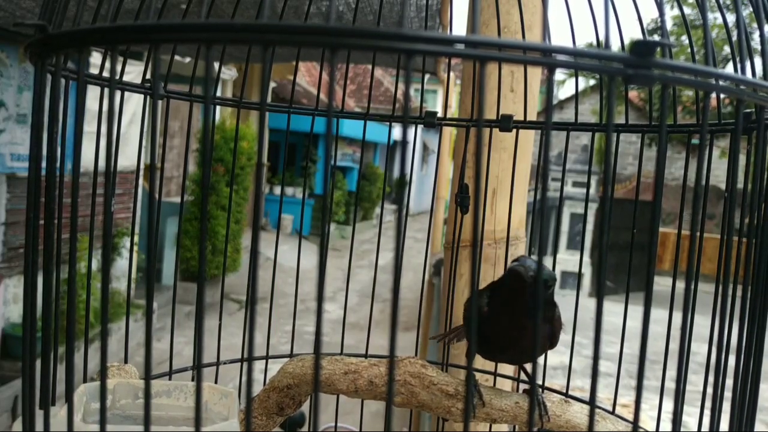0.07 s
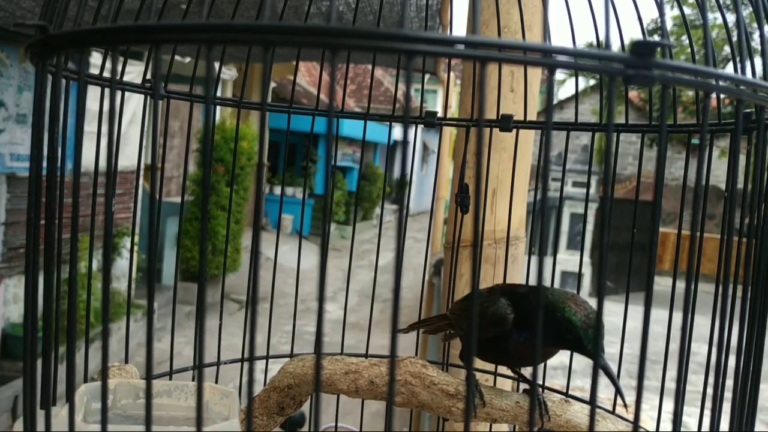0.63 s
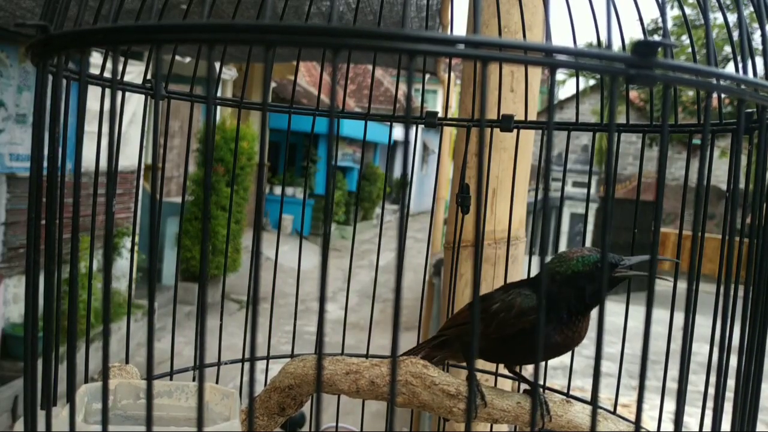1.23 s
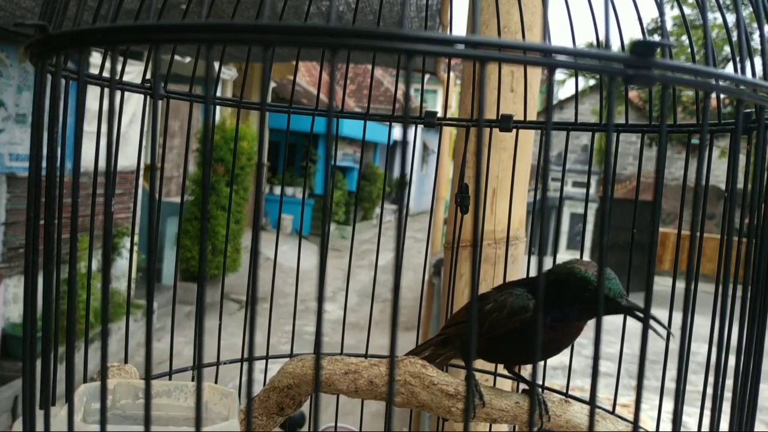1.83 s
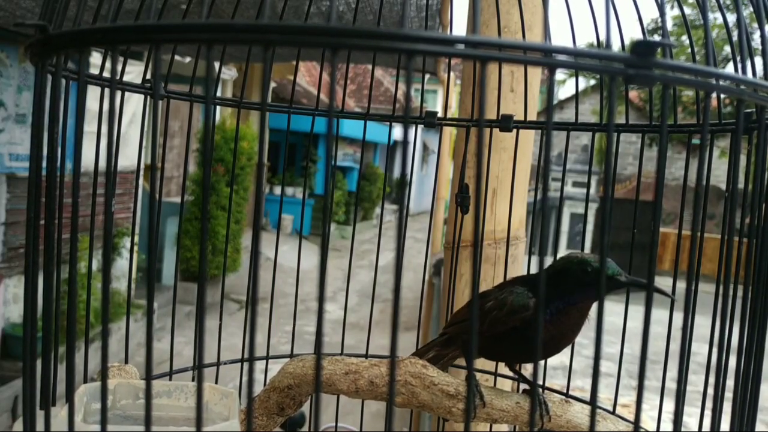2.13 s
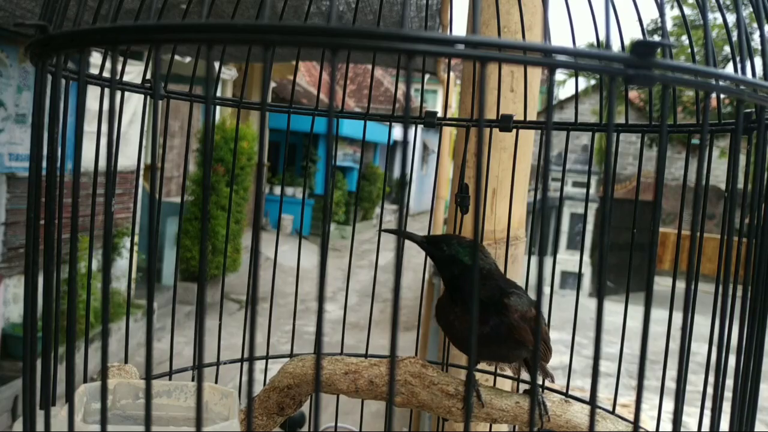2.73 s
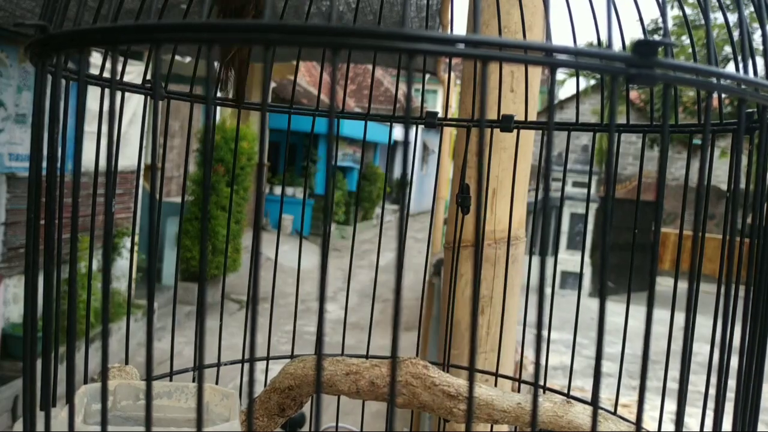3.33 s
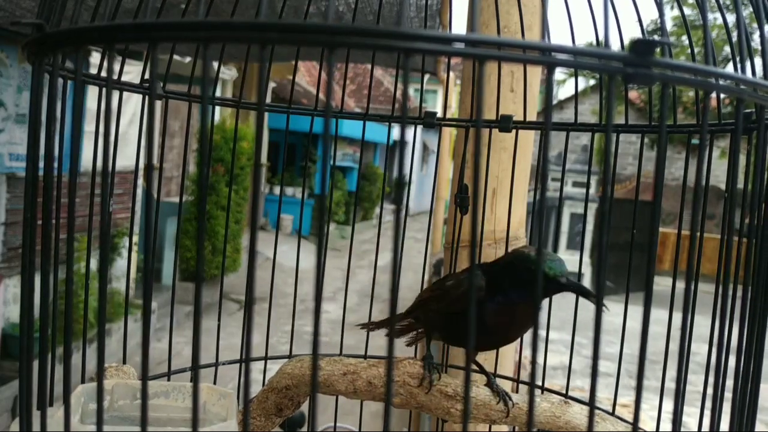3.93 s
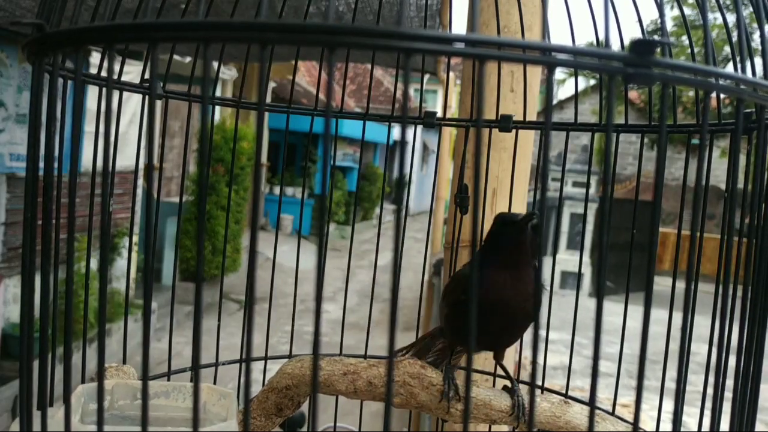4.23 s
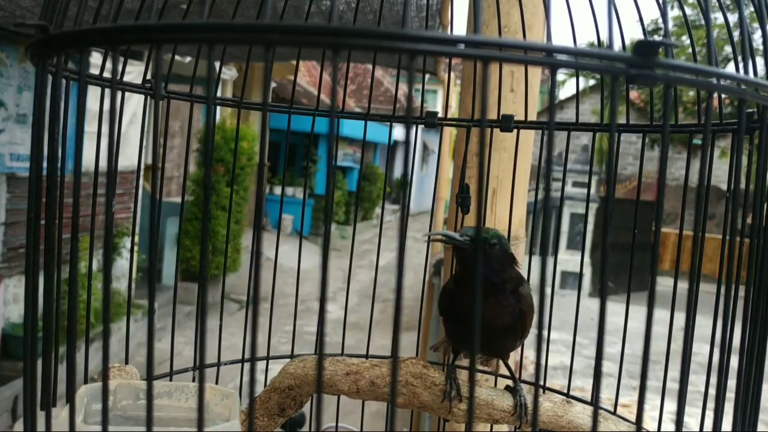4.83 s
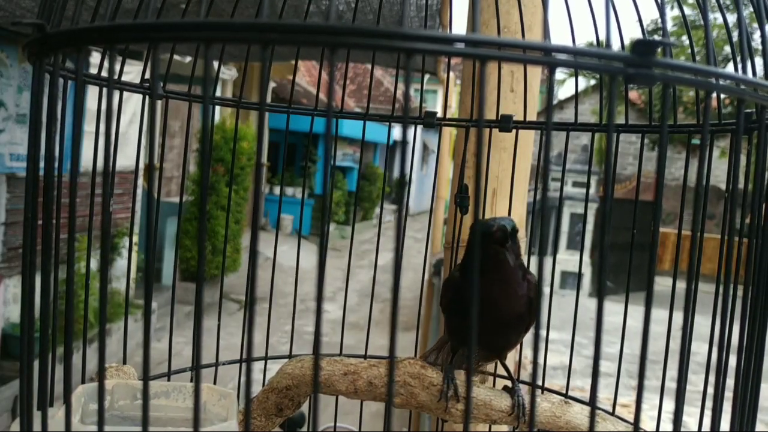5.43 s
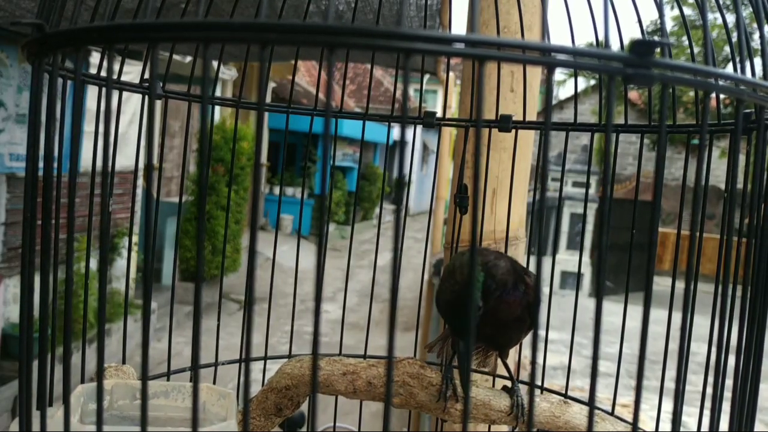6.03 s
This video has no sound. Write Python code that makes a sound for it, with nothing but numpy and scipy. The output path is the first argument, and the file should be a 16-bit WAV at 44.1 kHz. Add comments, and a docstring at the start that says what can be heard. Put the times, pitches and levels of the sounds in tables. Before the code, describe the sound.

A small caged bird gives sharp, high chirps close by and briefly flutters, over faint distant birds and a low town hum.

```python
"""A town hums and far birds twitter around a narrow lane. Close by, a caged sunbird wheezes on a slack
membrane, then chirps: fast arches of pitch, sung by both sides of its syrinx. A distant bird joins with
falling peeps. The sunbird wheezes again between chirps, pauses, and at three seconds flits up and back
to its perch before a quicker run of chirps. An automatic gain control ducks at every chirp and swells
back with the echo of the lane."""
import sys
import numpy as np
from scipy import signal
from scipy.fft import rfft, irfft
from scipy.io import wavfile
from scipy.ndimage import uniform_filter1d, minimum_filter1d

SR = 44100
rng = np.random.default_rng(int(sys.argv[2]) if len(sys.argv) > 2 else 0)


def wav_out(sig):
    """Save sig, one row per channel (or a flat mono array), as 16-bit PCM at SR to the path in sys.argv[1]."""
    wavfile.write(sys.argv[1], SR, np.round(np.clip(np.atleast_2d(sig).T, -1, 1) * 32767).astype(np.int16))


N = 272538
FREQS = np.maximum(np.arange(N // 2 + 1) * SR / N, 1)


def from_db(db):
    """Decibels to gain."""
    return 10 ** (np.asarray(db) / 20)


def rms_one(x):
    """Scale to unit rms."""
    return x / np.sqrt(np.mean(x ** 2) + 1e-20)


def at_hz(points, hz):
    """Read a curve on a log-frequency axis."""
    return np.interp(np.log(hz), *np.transpose([(np.log(f), v) for f, v in points]))


def add(out, start_s, sound):
    """Mix a sound in at a time."""
    start = max(round(start_s * SR), 0)
    out[..., start:start + sound.shape[-1]] += sound[..., :N - start]


def flutter(size, hz):
    """Random motion up to a given rate, at unit rms."""
    lowpass = signal.butter(2, hz, fs=SR, output="sos")
    return rms_one(signal.sosfilt(lowpass, rng.standard_normal(size)))


def ramp(x):
    """Smooth step from 0 to 1."""
    return np.sin(np.pi / 2 * np.clip(x, 0, 1)) ** 2


# Stereo image of the noise beds. Each row: frequency in Hz, correlation between the ears.
EAR_LIKENESS = [(60, 0.86), (170, 0.894), (350, 0.69), (700, 0.23), (1400, -0.63), (3000, 0.162),
                (12000, -0.044)]
def stereo_noise(spectrum):
    """Coloured noise at unit rms, centred in the bass and wide above it."""
    mid, side = rfft(rng.standard_normal((2, N))) * from_db(at_hz(spectrum, FREQS))
    alike = np.clip(at_hz(EAR_LIKENESS, FREQS), -1, 1)
    return rms_one(irfft(np.sqrt(1 + alike) * mid + np.sqrt(1 - alike) * np.array([side, -side]), N))


# Tone colour of the town's hum. Each row: frequency in Hz, relative level in dB.
TOWN_SPECTRUM = [(30, -43), (53, -36), (75, -18), (120, -14), (165, -2.5), (252, -0.5), (666, -9),
                 (1040, -12), (1760, -7), (2290, -9), (2750, -9), (6550, -17.5), (7670, -16.5),
                 (14400, -16.5), (16000, -39)]
def town_hum(db=-46, waver_db=.5):
    """A low bed of town noise whose level wavers slightly."""
    return from_db(db + waver_db * flutter(N, hz=9.7)) * stereo_noise(TOWN_SPECTRUM)


def far_twitters(per_s=12, length_s=.038, range_hz=(2890, 4700), faintest_db=-56.25, spread_db=7):
    """Small birds twitter at random, each short note sliding between two pitches."""
    out = np.zeros(N)
    progress = np.linspace(0, 1, int(length_s * SR))
    for when, first, last, loud in rng.random((int(per_s * N / SR), 4)):
        pitch = np.interp(first + (last - first) * progress, (0, 1), range_hz)
        level = from_db(faintest_db + spread_db * loud) * np.sin(np.pi * progress)
        add(out, when * (N - 1) / SR, level * np.sin(2 * np.pi * np.cumsum(pitch) / SR))
    return out


# A slack membrane slaps shut, a taut one swings smoothly.
# Each row: pitch in Hz, step from one harmonic to the next in dB.
HARMONIC_STEPS = [(2000, 4.5), (3500, -4.5), (5000, -4), (7000, -8.5)]
# Resonance of the throat and open beak. Each row: frequency in Hz, gain in dB.
THROAT_EQ = [(700, -36.5), (1500, -29), (3000, -24), (4000, -15.5), (5500, -6), (6500, -0.5), (7300, -11),
             (8200, -14), (10000, -16), (12500, -18), (13800, -8), (15500, -30.5)]
def syrinx(hz, rasp, waver, jitter, hiss, gape_db, lead_s=0, damping_db=0):
    """One membrane heard through the throat, roughened by uneven cycles and air torn at each opening."""
    size = len(hz)
    hz = hz * (1 + waver * flutter(size, hz=500))
    phase = 2 * np.pi * np.cumsum(hz) / SR + jitter * rasp * flutter(size, hz=1200)
    step_db = at_hz(HARMONIC_STEPS, hz)
    tone = sum(from_db(step_db * (k - 1)) * ramp((SR / 2 - k * hz) / 3000) * np.sin(k * phase)
               for k in range(1, 5))
    opening = (1 + np.sin(phase)) / 2
    breath = hiss * np.minimum(rasp, 1) * rng.standard_normal(size) * opening
    f = np.maximum(np.arange(size + 1) * SR / (2 * size), 1)
    beak_db = gape_db * ramp((f - 7500) / 4000)   # a wider beak lets out more of the top octave
    slack_db = damping_db * np.exp(-((f - 6500) / 2000) ** 2)   # a slack throat rings less
    colour = from_db(at_hz(THROAT_EQ, f) + beak_db - slack_db)
    ear_delay = np.exp(1j * np.pi * f * lead_s * np.array([[1], [-1]]))
    return irfft(rfft(tone + breath, 2 * size) * colour * ear_delay)[:, :size]


# The sunbird's two wheezy calls, the first broken into two notes. Each row: start in seconds,
# length in seconds, starting pitch in Hz, final pitch in Hz, level in dB, rasp in dB.
WHEEZE_NOTES = [(0, 0.0375, 4215, 3810, -3, -22), (0.039, 0.0225, 4085, 4250, -5.5, -4.5),
                (1.117, .145, 4196, 4775, -14.5, -10.5)]
def wheezes(attack_share=.13, release_s=.005, fade_db=-12.5, rasp_fade_db=-6.5):
    """A slack membrane gives a hoarse, wavering note that swells, then fades as its pitch settles."""
    out = np.zeros((2, N))
    for start_s, length_s, start_hz, end_hz, db, rasp_db in WHEEZE_NOTES:
        progress = np.linspace(0, 1, int(length_s * SR))
        pitch = start_hz + (end_hz - start_hz) * np.sin(np.pi / 2 * progress)
        gate = ramp(progress / attack_share) * ramp((1 - progress) * length_s / release_s)
        pressure = gate * from_db(db + fade_db * progress)
        rasp = from_db(rasp_db + rasp_fade_db * progress)
        note = syrinx(pitch, rasp, waver=.032, jitter=2.1, hiss=.6, gape_db=-2.5, damping_db=11)
        add(out, start_s, pressure * note)
    return out


def pitch_arch(ms, crest_ms, crest_hz, droop_hz, knee_hz=4000, climb_hz_per_ms=270):
    """Membrane tension shoots up through a knee at 0 ms, rounds off at the crest and relaxes."""
    lead_in = climb_hz_per_ms * np.minimum(ms, 0)
    below_crest = (crest_hz - knee_hz) * np.clip(1 - ms / crest_ms, 0, 1) ** 2.1
    droop = droop_hz * (np.maximum(ms - crest_ms, 0) / 10) ** 1.3
    return np.maximum(crest_hz + lead_in - below_crest - droop, knee_hz / 3)


# The sunbird's chirps. Each row: time of the knee in seconds, level in dB, body length in ms, crest
# pitch in Hz, droop 10 ms past the crest in Hz, harshness from 0 to 1, left ear's lead in microseconds.
CHIRP_NOTES = [ (.1624, 1, 25, 7220, 201, 0, -12), (0.4751, 1.5, 24, 7250, 300, 0.02, -13),
               (0.5801, -1, 23.9, 7130, 200, 0, 28.5), (.8624, 1.5, 26.6, 7390, 200, 0, 56),
               (1.265, 0.5, 32, 6450, 500, 0.74, 65.5), (1.8606, 1.5, 25, 7160, 790, 0.08, 54),
               (3.9226, 2.5, 32.5, 6730, 465, 0.78, -12), (4.0547, 3, 31.8, 6540, 450, 0.77, -12),
               (4.2019, -0.5, 38.6, 6955, 615, 0.37, -11), (4.4355, 3, 29.9, 7060, 680, 0.57, 11),
               (4.8434, 2.5, 27.3, 7240, 250, 0, -47), (5.0919, 2, 29.7, 6780, 606, 0.66, 32),
               (5.3669, 2, 32.6, 6660, 438, 0.68, -22.5), (5.478, 2.5, 34.5, 6740, 620, .95, 28),
               (5.6028, 2, 30, 6670, 795, 0.82, -26)]
def chirps(release_ms=10.6, onset_rasp_db=6, low_joins_ms=5, low_swells_ms=11):
    """The high voice leads, rough until it settles; the low one joins near the crest and beats with it."""
    out = np.zeros((2, N))
    for knee_s, db, length_ms, crest_hz, droop_hz, harshness, ear_us in CHIRP_NOTES:
        def clear_to_harsh(clear, harsh):
            return clear + (harsh - clear) * harshness

        lead_in_ms = clear_to_harsh(1.493, 10)
        ms = np.arange(-lead_in_ms - 1.5, length_ms + 2, 1000 / SR)
        crest_ms = (crest_hz - 5050) / 139   # a higher crest takes longer to reach
        high_hz = pitch_arch(ms, crest_ms, crest_hz, droop_hz)
        low_hz = pitch_arch(ms, 1.2 * crest_ms, crest_hz - clear_to_harsh(900, 1350), .4 * droop_hz)
        rasp = from_db(clear_to_harsh(-18.5, -7.5) + onset_rasp_db * (1 - ramp(ms / 4)))
        high, low = [syrinx(hz, rasp, waver=.004, jitter=1.1, hiss=1.9, gape_db=1.5, lead_s=ear_us / 1e6)
                     for hz in (high_hz, low_hz)]
        attack_ms = 1.86 * (lead_in_ms + 1)
        gate = ramp((ms - ms[0]) / attack_ms) * ramp((ms[-1] - ms) / release_ms)
        climb_db = clear_to_harsh(-6.5, 3.5)   # pressure on the climb, against that at the crest
        pressure = gate * from_db(db + climb_db * (.5 - ramp(ms / crest_ms)))
        high_gain = from_db(clear_to_harsh(3, -.5) * (np.maximum(ms, 0) / length_ms) ** 2)
        low_gain = from_db(clear_to_harsh(-12, -6.5)) * ramp((ms - low_joins_ms) / low_swells_ms)
        add(out, knee_s + ms[0] / 1000, pressure * (high_gain * high + low_gain * low))
    return out


# The distant bird's peeps. Each row: start in seconds, level sent to the echo in dB.
PEEP_NOTES = [(.33, -42), (.575, -47), (0.968, -42.5), (1.375, -46), (1.669, -43.5), (2.29, -45.5),
              (2.519, -46.5), (2.8, -44.5), (3.335, -46.5), (3.691, -42), (4.235, -45.5), (4.51, -41),
              (5.106, -41), (5.61, -42.5), (5.874, -41)]
def far_peeps(start_hz=3950, end_hz=2620, length_s=.105, pitch_spread=.0253, length_spread=.1425):
    """Thin falling whistles, no two quite alike, made unsteady by the long way they travel."""
    out = np.zeros(N)
    for (start_s, db), (higher, longer) in zip(PEEP_NOTES, rng.uniform(-1, 1, (len(PEEP_NOTES), 2))):
        size = int(length_s * (1 + length_spread * longer) * SR)
        progress = np.linspace(0, 1, size)
        glide = end_hz + (start_hz - end_hz) * (1 - progress) ** 1.7
        pitch = glide * (1 + pitch_spread * higher) * (1 + .035 * flutter(size, hz=200))
        gate = ramp(progress / .1) * ramp((1 - progress) / .21)
        level = gate * from_db(db + 3.5 * flutter(size, hz=60))
        add(out, start_s, level * np.sin(2 * np.pi * np.cumsum(pitch) / SR))
    return out


# Tone colour of brushing feathers. Each row: frequency in Hz, relative level in dB.
FEATHER_SPECTRUM = [(590, -35.5), (1000, -4.5), (2710, -1), (3300, -29), (3710, -3.5), (11600, -12),
                    (16000, -9)]
# The flit up and the flit back. Each row: start in seconds, length in seconds, air puff level in dB,
# its change over the flight in dB, feather rustle level in dB, its change in dB.
FLITS = [(3.082, 0.194, -38, -15.5, -70, 3), (3.63, 0.193, -53, 5, -51, 10.5)]
def wings(wingbeat_s=.033, puff_s=.017, rustle_rise_s=.018, rustle_fall_s=.038, uneven_db=2.5):
    """Each steady wingbeat pushes a soft puff of air and brushes the feathers together."""
    t = np.arange(N) / SR
    puff, rustle = np.zeros((2, N))
    for start_s, length_s, puff_db, puff_change_db, rustle_db, rustle_change_db in FLITS:
        for beat_s in np.arange(0, length_s, wingbeat_s):
            age = t - start_s - beat_s
            puff += from_db(puff_db + puff_change_db * beat_s / length_s) * np.exp(-(age / puff_s) ** 2)
            brush = ramp(1 + age / rustle_rise_s) * np.exp(-np.maximum(age, 0) / rustle_fall_s)
            rustle += from_db(rustle_db + rustle_change_db * beat_s / length_s) * brush
    air = stereo_noise([(60, -54), (140, -8.5), (190, 4), (270, -9), (600, -13.5),
                        (1500, -23), (6000, -64)])
    feathers = from_db(uneven_db * flutter(N, hz=80)) * stereo_noise(FEATHER_SPECTRUM)
    return puff * air + rustle * feathers


def lane_echo(x, early_db, late_db, early_t60, late_t60, build_s=.0045):
    """Dense reflections off the near walls, then a longer echo down the lane; different in each ear."""
    t = np.arange(SR) / SR
    response = 0
    for db, t60 in ((early_db, early_t60), (late_db, late_t60)):
        echoes = rng.standard_normal((2, SR)) * ramp(t / build_s) * from_db(-60 * t / t60)
        response = response + from_db(db) * rms_one(echoes) / np.sqrt(SR)
    return signal.fftconvolve(np.broadcast_to(x, (2, N)), response, axes=1)[:, :N]


# Stereo tilt on the sunbird's voice. Each row: frequency in Hz, left minus right in dB.
MIC_TILT = [(1500, .2), (4000, -1), (6500, 0), (9000, 3.5), (14000, 5)]
def mic_balance(x):
    """The right microphone is duller, so the top end leans left."""
    tilt_db = at_hz(MIC_TILT, FREQS) * np.array([[.5], [-.5]])
    return irfft(rfft(x) * from_db(tilt_db), N)


def scene():
    """The near bird with its echo, the far birds heard by echo alone, the town and the wings."""
    sharp, hoarse = chirps(), wheezes()
    sharp_echo = lane_echo(sharp, early_db=-14, late_db=-19.5, early_t60=.095, late_t60=.49, build_s=.0033)
    hoarse_echo = lane_echo(hoarse, early_db=1, late_db=3, early_t60=.18, late_t60=.46)
    sunbird = mic_balance(sharp + sharp_echo + hoarse + hoarse_echo)
    far_calls = far_peeps() + far_twitters()
    far_birds = lane_echo(far_calls, early_db=-2.5, late_db=-2.5, early_t60=.2, late_t60=.8)
    return town_hum() + far_birds + sunbird + wings()


def gain_control(x, threshold_db=-13, release_db_per_s=170, hold_s=.011, attack_s=.0064):
    """The gain falls within milliseconds of a loud sound, waits, and climbs back steadily."""
    power = uniform_filter1d(np.mean(x ** 2, axis=0), size=44)
    over_db = np.maximum(10 * np.log10(np.maximum(power, 1e-12)) - threshold_db, 0)
    hold = 2 * int(hold_s * SR / 2) + 1
    held_db = -minimum_filter1d(-over_db, hold, origin=hold // 2)
    recovery_db = release_db_per_s * np.arange(N) / SR
    cut_db = np.maximum.accumulate(held_db + recovery_db) - recovery_db
    pole = np.exp(-1 / (attack_s * SR))
    return x * from_db(-signal.lfilter([1 - pole], [1, -pole], cut_db))


def record(dry, ceiling=.85, cutoff_hz=15600):
    """Gain control ducks the mix, peaks that slip past it are rounded, then the top is cut."""
    ducked = gain_control(dry)
    rounded = ducked / (1 + (ducked / ceiling) ** 8) ** (1 / 8)
    return signal.sosfilt(signal.ellip(10, .2, 80, cutoff_hz, fs=SR, output="sos"), rounded)


dry = scene()
out = record(dry)
wav_out(out)
```